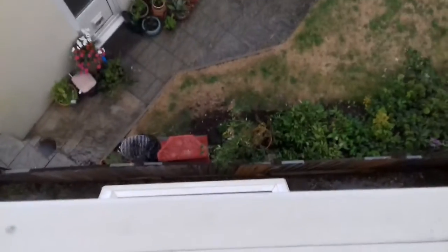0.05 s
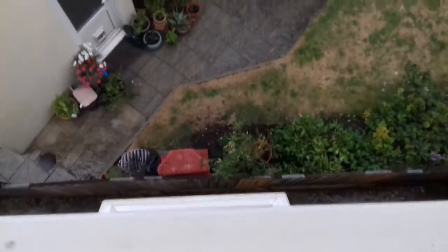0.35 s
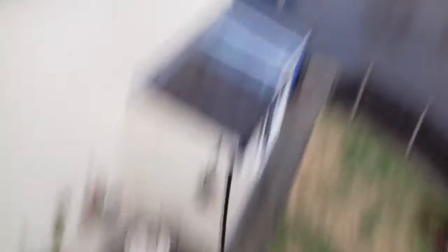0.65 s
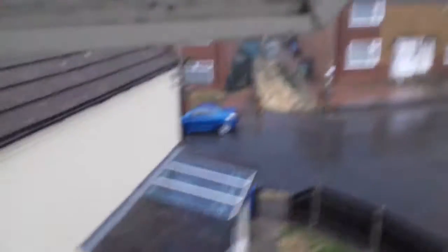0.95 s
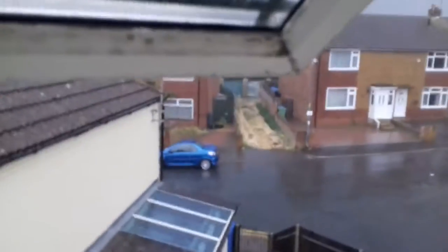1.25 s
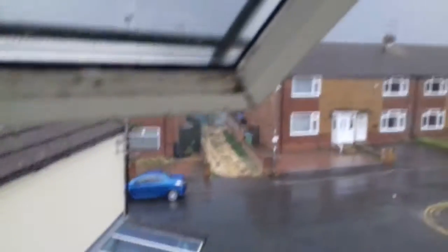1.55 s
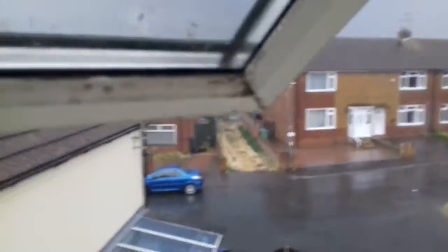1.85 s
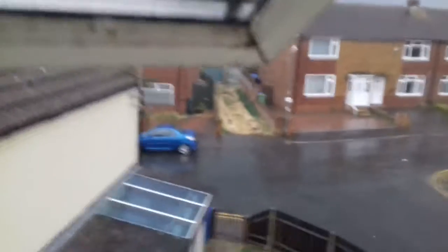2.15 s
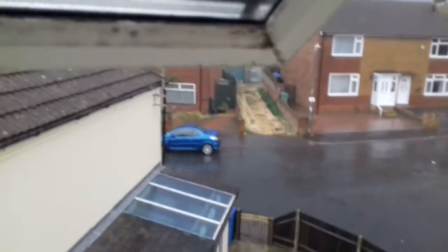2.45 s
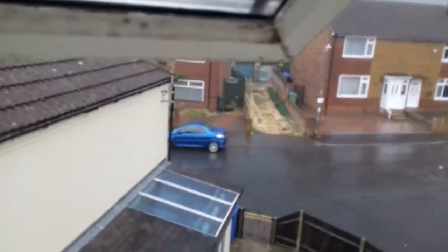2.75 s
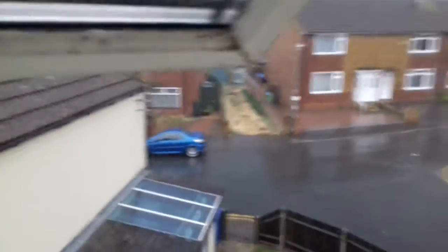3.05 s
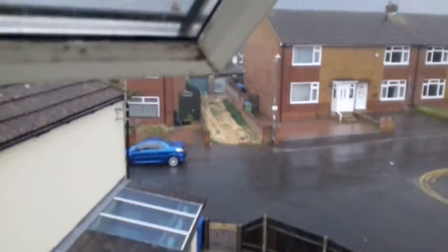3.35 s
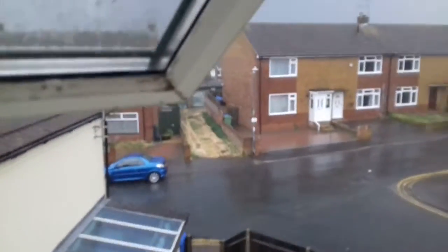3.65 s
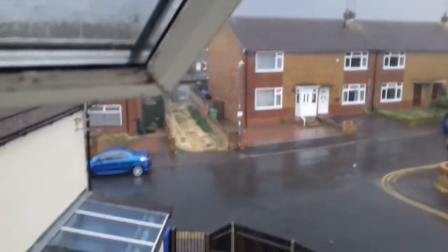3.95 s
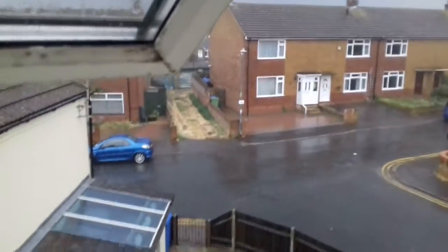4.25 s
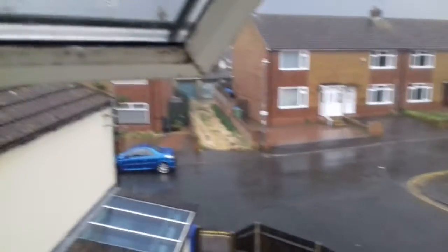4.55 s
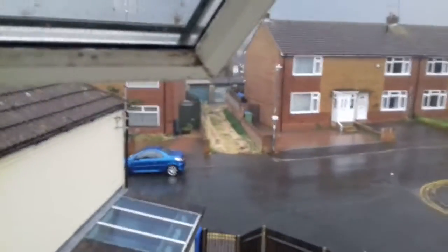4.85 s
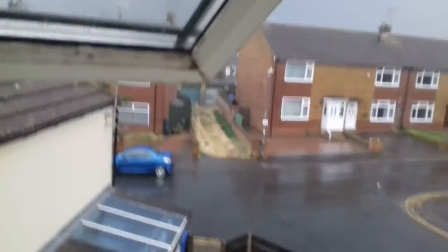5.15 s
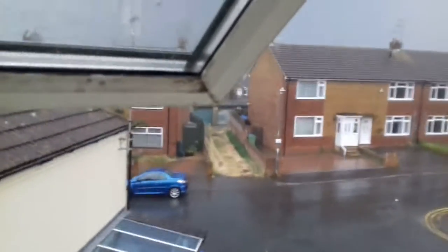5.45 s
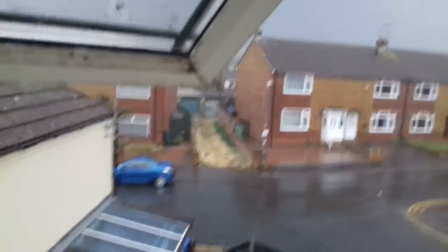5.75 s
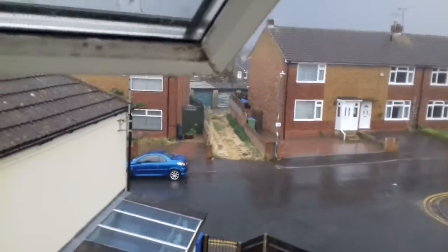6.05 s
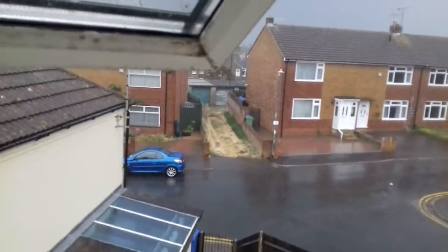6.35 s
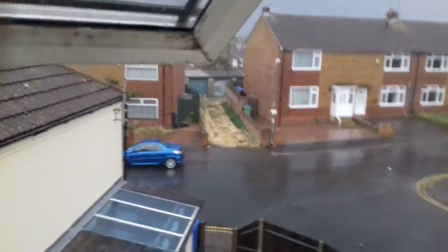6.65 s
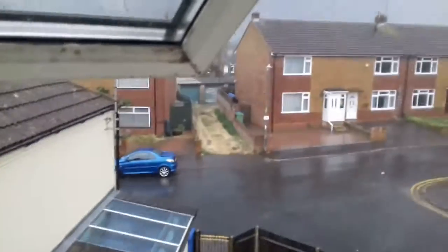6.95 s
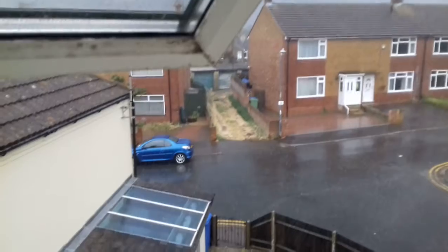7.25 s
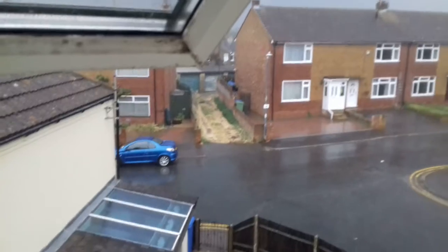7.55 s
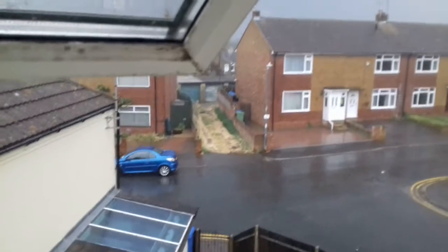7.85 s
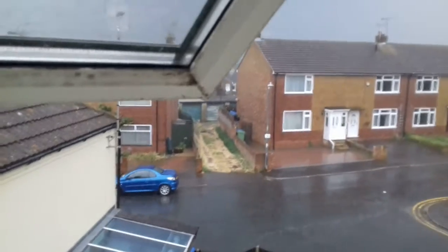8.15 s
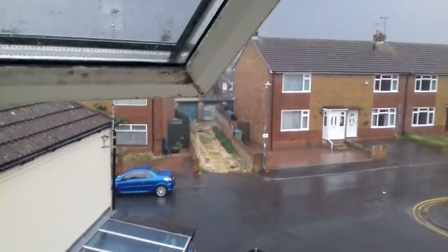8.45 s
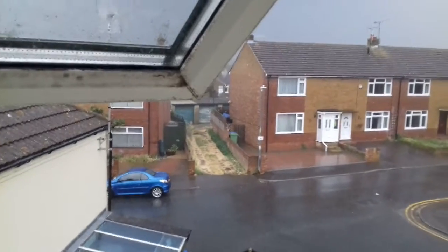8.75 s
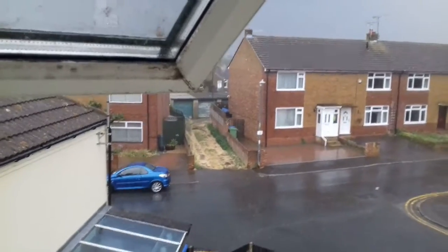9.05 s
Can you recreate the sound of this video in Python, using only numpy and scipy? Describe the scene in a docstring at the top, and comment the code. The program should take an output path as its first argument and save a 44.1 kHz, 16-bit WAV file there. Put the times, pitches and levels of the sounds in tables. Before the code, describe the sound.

Steady rain hisses on roofs and street outside an open window, with close drips ticking and a few knocks on the glass.

```python
"""Upstairs at an open roof window, with steady rain falling on the roofs and the street.
Distant impacts superpose into a roar, a hiss and a sizzle; nearer drops excite damped resonances of
wet tiles, pattering on the roofs and ticking close by. Drips splat and tiny drops prickle on the sill.
Now and then a knock sends bending waves through the pane, or a scuff sounds the hollow frame.
Puffs of wind rumble on the microphone, and a faint far hum lies beneath it all."""
import sys
import numpy as np
from scipy import signal
from scipy.fft import rfft, irfft, next_fast_len
from scipy.io import wavfile

SR = 44100
rng = np.random.default_rng(int(sys.argv[2]) if len(sys.argv) > 2 else 0)


def store_pcm(level_fs):
    """Save levels as 16-bit WAV."""
    pcm = np.round(np.clip(level_fs, -1, 1) * 32767).astype(np.int16)
    wavfile.write(sys.argv[1], SR, np.atleast_2d(pcm).T)


N = 405719

# Source spectra: f/Hz, relative spectral level/dB
WIND_SPECTRUM = [(20, -24), (55, -3), (100, 2), (180, -7), (300, -20), (800, -60)]  # turbulence at the microphone
FRAME_SPECTRUM = [(80, -25), (300, -4), (560, -1), (800, -0.5), (1200, -27), (4000, -36)]  # hollow window frame
PANE_SPECTRUM = [(40, -42), (130, -7), (400, 2.5), (650, -1), (1100, 2.5), (2000, -5.5), (4200, -2.5),
                 (6000, -29), (16000, -40)]  # knocked glass
ROAR_SPECTRUM = [(20, -46), (55, -21), (110, -7.5), (250, 0), (600, 0), (1400, 2), (2200, 1), (4200, -24),
                 (5500, -20), (9000, -23), (12000, -25.5), (16000, -34)]  # far rain
HISS_SPECTRUM = [(300, -41), (1000, -8.5), (1650, -8), (2050, -1.5), (3000, 3.5), (4100, 2), (4500, -2),
                 (5100, -11), (7000, -28), (16000, -75)]  # rain on the roofs
SIZZLE_SPECTRUM = [(2500, -10.5), (4200, 5), (5500, -0.5), (6500, -3), (7500, -9.5), (8800, -9.5),
                   (10000, -31), (16000, -24)]  # rain on the wet street
SPLASH_SPECTRUM = [(200, -63), (1000, -6.5), (1600, -2.5), (2100, 0), (4200, 4), (5200, -4.5),
                   (7000, -19.5), (10000, -43), (16000, -39)]  # one drop on a tile
SPRAY_SPECTRUM = [(1500, -24), (4000, 13.5), (8500, 5), (11500, -2), (14000, -1), (16000, -29)]  # tiny drops on the sill
# Puffs of wind: t/s, nominal peak level/dB
WIND_PUFFS = [(.5, -53), (2.05, -52), (2.28, -36.5), (2.52, -49), (6.28, -53), (6.9, -56)]
# Scuffs on the frame: t/s, duration/s, level/dB
FRAME_SCUFFS = [(4.725, 0.094, -37), (4.831, 0.093, -39), (5.036, 0.068, -43), (5.414, 0.097, -38)]
# Knocks on the pane: t/s, peak level/dB, group delay at 500 Hz/s, thud f/Hz
PANE_KNOCKS = [(4.633, -19.5, .0025, 450), (4.727, -20, 0.0017, 270), (4.8155, -16, 0.0016, 480),
               (4.863, -7, 0.00104, 466), (4.874, -25, 0.00258, 720), (4.8895, -26, 0.0032, 580),
               (5.049, -23.5, 0.0034, 650), (5.266, -29, 0.0033, 400), (5.693, -17.5, 0.0048, 560),
               (6.035, -13, 0.0025, 244), (7.8826, -21, 0.0021, 780), (7.910, -23, 0.0052, 750)]
# Strength of the rain, in relative levels: t/s, roar level/dB, hiss level/dB, sizzle level/dB
RAIN_LEVELS = [(0.0, -35.5, -28.5, -49), (0.6, -36, -29, -48), (1.64, -38, -27.5, -41.5),
               (2.15, -37, -29, -46), (2.8, -37, -28.5, -45.5), (3.85, -40, -29.5, -50),
               (4.38, -40.3, -32, -56), (4.82, -38.5, -30.5, -58), (5.17, -41, -31, -45.5),
               (5.45, -40.5, -28, -38), (6.15, -41.5, -29.5, -39.5), (7.53, -41.5, -28.5, -39),
               (8.58, -43, -29, -39.5), (9.2, -41.5, -30, -41.5)]
# Microphone position: t/s, place (0 behind the frame, 1 out in the opening)
MIC_PATH = [(0, 0.25), (3.4, 0.041), (4.8, .4), (5.6, 0.7), (9.2, 0.7)]
# Transfer functions to those two places: f/Hz, gain/dB
FRAME_RESPONSE = [(150, -3), (450, 0), (700, -1.5), (1500, 0), (2400, 1.5), (3050, -4.5), (3650, 0.5),
                  (4500, -3), (7000, 2)]
OPENING_RESPONSE = [(150, 1), (280, 0.5), (400, -3.5), (700, -0.5), (1120, -1), (1400, -3.5), (2000, 1),
                    (2300, -4.5), (2800, 1.5), (3750, -0.5), (4300, 3), (7000, 0.5)]
# Sharpest of the tiny drops on the sill: t/s, initial level/dB
SILL_PRICKS = [(.2865, -28), (.678, -30), (3.4785, -30), (4.0236, -26.5), (4.1023, -28), (4.863, -31),
               (6.774, -28), (7.175, -29), (9.063, -29)]
# Fat drips in the gutter and on the sill: t/s, initial level/dB, centre f/Hz
FAT_DRIPS = [(0.875, -28, 3930), (2.11, -23.5, 3880), (2.587, -24, 3800), (2.978, -19.5, 3100),
             (6.218, -22, 4340), (6.884, -26, 4470), (7.425, -27.5, 1700), (7.488, -29.5, 1400),
             (7.781, -22.5, 4970), (8.114, -28, 1500), (8.536, -23.5, 4170), (8.78, -29, 4600)]
# Largest drops on the nearest tiles: t/s, relative peak level/dB, ring f/Hz
LARGE_DROPS = [(.186, -13, 2900), (.235, -12, 2330), (.284, -12, 2450), (.512, -11, 3670),
               (1.515, -12, 3770), (1.528, -9, 3660), (1.940, -10, 2600), (2.213, -10, 2910),
               (2.216, -10, 3340), (3.898, -12, 2470), (3.981, -13, 2480), (4.100, -15, 3110),
               (4.126, -12, 3370), (4.622, -11, 4240), (4.840, -8, 2060), (4.997, -11, 2690),
               (5.218, -11, 3910), (5.391, -6, 2100), (5.567, -10, 4020), (5.698, -12, 2860),
               (5.748, -11, 4160), (5.819, -10, 4150), (6.768, -10, 4330), (7.313, -14, 2120),
               (7.425, -13, 2750), (7.479, -13, 1980), (7.768, -13, 4320), (8.039, -13, 2870),
               (8.114, -11, 1770), (8.874, -11, 3140), (8.963, -11, 4150)]


def gain_of(db):
    """Amplitude ratio of a level: a factor of ten per 20 dB."""
    return 10 ** (np.asarray(db) / 20)


def unit_rms(x):
    """Normalisation to unit mean power."""
    return x / np.sqrt(np.mean(x ** 2) + 1e-20)


def unit_peak(x):
    """Normalisation to unit peak amplitude."""
    return x / (abs(x).max() + 1e-20)


def spectrum_gain(spectrum, hz):
    """Gain by interpolation of level over logarithmic frequency."""
    f, db = np.transpose(spectrum)
    return gain_of(np.interp(np.log(hz + 1), np.log(f + 1), db))


def rain_envelope(layer):
    """Amplitude envelope of one rain layer, by interpolation of level over time."""
    times, roar, hiss, sizzle = np.transpose(RAIN_LEVELS)
    db = {"roar": roar, "hiss": hiss, "sizzle": sizzle}[layer]
    return gain_of(np.interp(np.arange(N) / SR, times, db))


def coloured(x, spectrum):
    """Zero-phase filtering by multiplication in the frequency domain."""
    size = next_fast_len(2 * len(x))
    gain = spectrum_gain(spectrum, np.fft.rfftfreq(size, 1 / SR))
    return irfft(rfft(x, size) * gain, size)[:len(x)]


def noise(spectrum):
    """Stationary Gaussian noise of given spectral shape and unit rms."""
    return unit_rms(coloured(rng.standard_normal(N), spectrum))


def drift(cutoff_hz):
    """Slow random fluctuation of unit rms: noise band-limited from about 1 Hz to the cutoff."""
    spectrum = rfft(rng.standard_normal(N // 64))
    hz = np.arange(len(spectrum)) * SR / N
    slow = irfft(spectrum * hz / (hz + 1) / (1 + (hz / cutoff_hz) ** 2))
    return unit_rms(np.interp(np.linspace(0, len(slow) - 1, N), np.arange(len(slow)), slow))


def impacts(per_s, spread_db):
    """Random impulses with exponentially distributed levels: many small, few large."""
    train = np.zeros(N)
    at = rng.integers(0, N, max(int(per_s * N / SR), 1))
    train[at] = gain_of(spread_db * np.minimum(rng.exponential(1, len(at)), 3.4))
    return train


def add(mix, start_s, sound):
    """Linear superposition of a sound on the mix."""
    part = mix[max(round(start_s * SR), 0):][:len(sound)]
    part += sound[:len(part)]


def hum(centre_hz=111, level_db=-66.5):
    """Random frequency and amplitude modulation make a faint far tone waver."""
    tone = np.sin(2 * np.pi * np.cumsum(centre_hz + 6 * drift(8.3)) / SR)
    return gain_of(level_db) * unit_rms(tone * gain_of(2.6 * drift(6.2)))


def wind(rise_db_per_s=230, fall_db_per_s=150, breeze_db=-80):
    """Turbulent pressure buffets the microphone; each puff swells and decays into a faint breeze."""
    t, strength = np.arange(N) / SR, gain_of(breeze_db)
    for s, db in WIND_PUFFS:
        below_peak_db = np.maximum((s - t) * rise_db_per_s, (t - s) * fall_db_per_s)
        strength = strength + gain_of(db - below_peak_db)
    lumps = gain_of(2 * drift(14))
    return noise(WIND_SPECTRUM) * strength * lumps


def frame_scuffs():
    """Friction: a rapid series of small slips excites the hollow window frame."""
    strokes = np.zeros(N)
    for s, length_s, db in FRAME_SCUFFS:
        add(strokes, s, gain_of(db) * np.hanning(int(length_s * SR)) ** .5)
    slips = impacts(per_s=760, spread_db=1.5) * rng.choice([-1, 1], N)
    return strokes * unit_rms(coloured(slips, FRAME_SPECTRUM))


def pane_knocks(size=4096):
    """Dispersion: bending waves in glass run faster at high frequency, so a knock is a falling chirp."""
    out, hz = np.zeros(N), np.fft.rfftfreq(size, 1 / SR)
    for s, db, delay_s, thud_hz in PANE_KNOCKS:
        lag_cycles = 2 * delay_s * np.sqrt(500 * hz)
        thud = 1 + 2.14 * np.exp(-(np.log2((hz + 1) / thud_hz) / 0.61) ** 2)
        knock = irfft(spectrum_gain(PANE_SPECTRUM, hz) * thud * np.exp(-2j * np.pi * lag_cycles))
        add(out, s, gain_of(db) * unit_peak(knock[:size // 2]))
    return out


def far_rain(shower, splash_decay_s=.002):
    """Incoherent addition: countless far drops merge into a roar, a hiss and a grainy sizzle."""
    roar = gain_of(1.5) * noise(ROAR_SPECTRUM) * rain_envelope("roar")
    hiss = gain_of(-2.0) * noise(HISS_SPECTRUM) * rain_envelope("hiss")
    t = np.arange(0, .04, 1 / SR)
    energies = impacts(per_s=1000, spread_db=4.5) ** 2
    splash_power = signal.oaconvolve(energies, np.exp(-t / splash_decay_s))[:N]
    splashes = unit_rms(noise(SIZZLE_SPECTRUM) * np.sqrt(abs(splash_power)))
    sizzle = gain_of(-0.5) * splashes * rain_envelope("sizzle")
    return roar + (hiss + sizzle) * shower


def tile_drop(hz, ring_s, splash, tail_db, tail_s):
    """Damped resonance of a wet tile, with a splash near that pitch and a tail scattered off walls."""
    t = np.arange(0, .08, 1 / SR)
    ring = np.exp(-t / ring_s) * np.sin(2 * np.pi * (hz * t + rng.random()))
    splash_envelope = splash * np.exp(-t / .003) + gain_of(tail_db) * np.exp(-t / tail_s)
    splash_noise = coloured(rng.standard_normal(len(t)), SPLASH_SPECTRUM)
    splash_noise = coloured(splash_noise, [(hz / 2, -6), (hz, 0), (2 * hz, -8)])
    attack = 1 - np.exp(-t / .0003)
    return (ring + unit_rms(splash_noise) * splash_envelope) * attack


def roof_patter(spots=40, drops_per_s=420):
    """Convolution: each spot on the neighbouring roofs answers drops with its own impulse response."""
    out = np.zeros(N)
    for hz in np.linspace(2020, 4350, spots):
        ring_s = .0014 * 2 ** rng.uniform(-1.5, 1.5)
        response = tile_drop(hz, ring_s, splash=.22, tail_db=-22, tail_s=.014)
        hits = impacts(per_s=drops_per_s / spots, spread_db=4.5)
        out += signal.oaconvolve(hits, unit_rms(response))[:N]
    return gain_of(-5.0) * unit_rms(out) * rain_envelope("hiss")


def through_window(rain):
    """Interference: reflections off the frame colour the rain differently as the microphone moves."""
    place = np.clip(np.interp(np.arange(N) / SR, *np.transpose(MIC_PATH)), 0, 1)
    return (1 - place) * coloured(rain, FRAME_RESPONSE) + place * coloured(rain, OPENING_RESPONSE)


def sill_spray(decay_s=.0013):
    """Brief impacts radiate high frequencies: tiny drops prickle on the sill, a few more sharply."""
    t = np.arange(0, .02, 1 / SR)
    hits = gain_of(-53) * impacts(per_s=70, spread_db=4)
    for s, db in SILL_PRICKS:
        add(hits, s, gain_of([db]))
    return signal.oaconvolve(hits, np.exp(-t / decay_s))[:N] * noise(SPRAY_SPECTRUM)


def drip_splats(decay_s=.0076):
    """Break-up on impact turns a fat drip into a noise burst: dull in the gutter, bright on the sill."""
    t, out = np.arange(0, .06, 1 / SR), np.zeros(N)
    for s, db, hz in FAT_DRIPS:
        band = [(hz / 4, -30), (hz * .75, 0), (hz * 1.2, -2), (hz * 2, -22), (hz * 3, -42)]
        burst = unit_rms(coloured(rng.standard_normal(len(t)), band))
        add(out, s, gain_of(db) * np.exp(-t / decay_s) * burst)
    return out


def close_drops(strays_per_s=5, above_hiss_db=12.5, spread_db=2.5, stray_hz=(2100, 4450)):
    """Impulse excitation of the nearest tiles: large drops, and random strays scaled to the hiss."""
    out, hiss = np.zeros(N), rain_envelope("hiss")
    drops = [(s, gain_of(db - 1.5), hz) for s, db, hz in LARGE_DROPS]
    for when, size, spot in rng.random((int(strays_per_s * N / SR), 3)):
        peak = hiss[int(when * N)] * gain_of(above_hiss_db + spread_db * (2 * size - 1))
        drops.append((when * N / SR, peak, np.interp(spot, [0, 1], stray_hz)))
    for s, peak, hz in drops:
        tick = tile_drop(hz, ring_s=.0016, splash=.21, tail_db=-22.5, tail_s=.011)
        add(out, s, peak * unit_peak(tick))
    return out


def scene():
    """Superposition of all sources; a common modulation makes the shower thicken and thin."""
    shower = gain_of(.75 * drift(22))
    rain = through_window(far_rain(shower) + roof_patter() * shower)
    near_rain = close_drops() + drip_splats() + sill_spray()
    return (rain + near_rain + pane_knocks() + frame_scuffs() + wind() + hum())[None]


def record(dry, low_hz=42, high_hz=15830):
    """Band limiting: the microphone loses the deepest bass, and a steep low-pass cuts the top treble."""
    highpass = signal.butter(2, low_hz, "highpass", fs=SR, output="sos")
    lowpass = signal.firwin(511, high_hz, window=("kaiser", 9), fs=SR)
    return signal.oaconvolve(signal.sosfilt(highpass, dry), lowpass[None], "same")


dry = scene()
out = record(dry)
store_pcm(out)
```